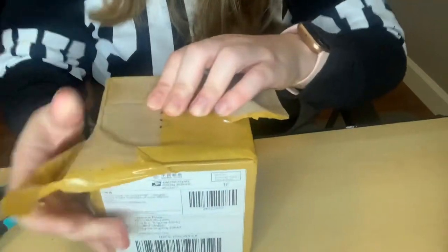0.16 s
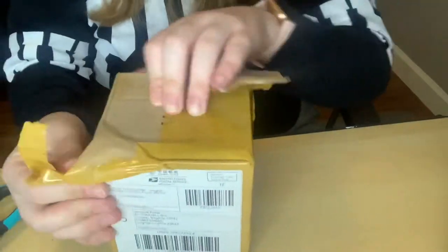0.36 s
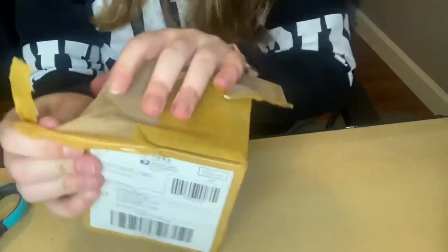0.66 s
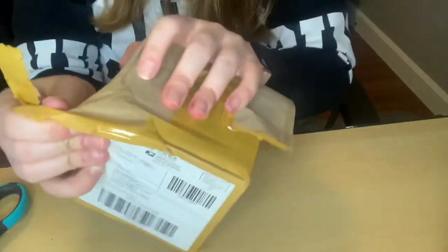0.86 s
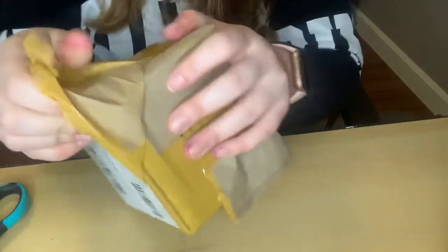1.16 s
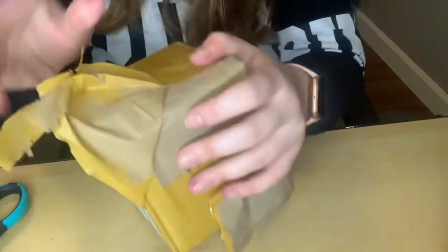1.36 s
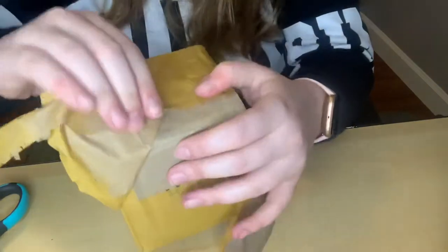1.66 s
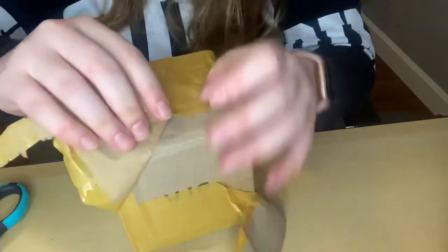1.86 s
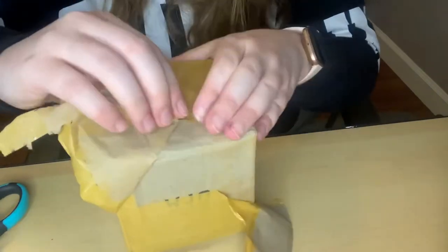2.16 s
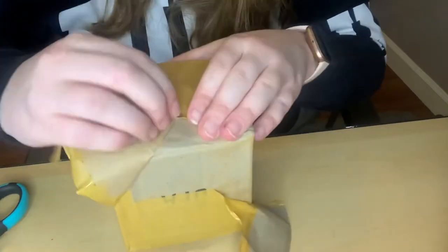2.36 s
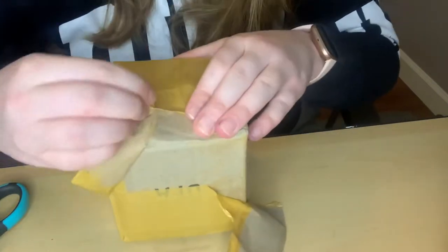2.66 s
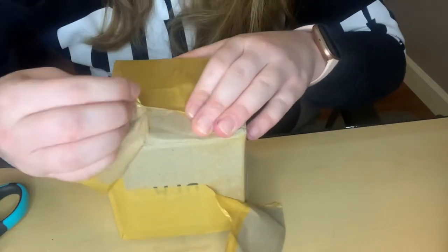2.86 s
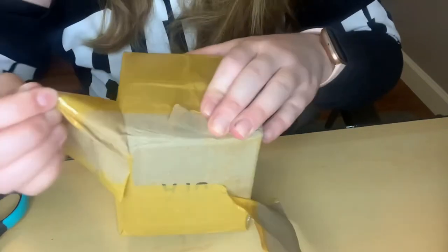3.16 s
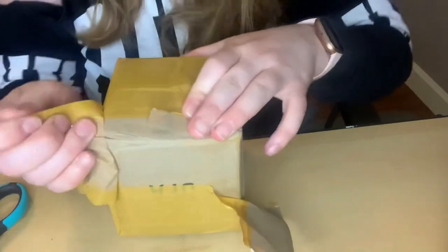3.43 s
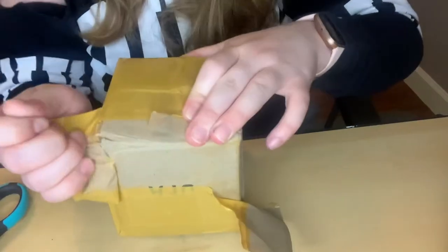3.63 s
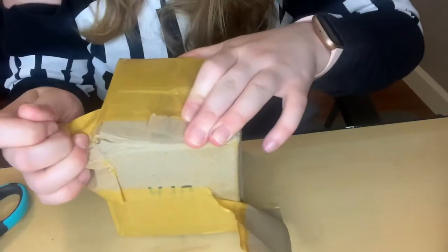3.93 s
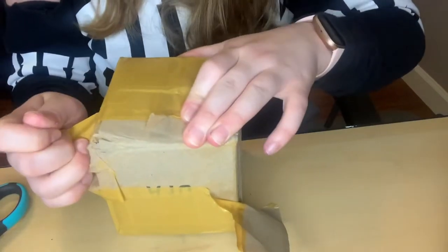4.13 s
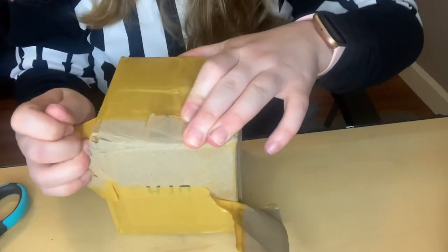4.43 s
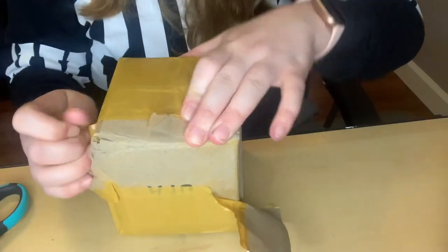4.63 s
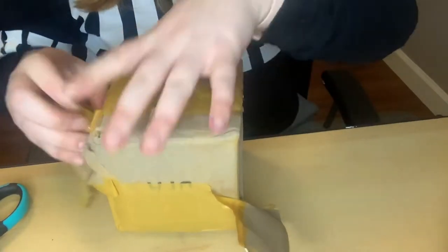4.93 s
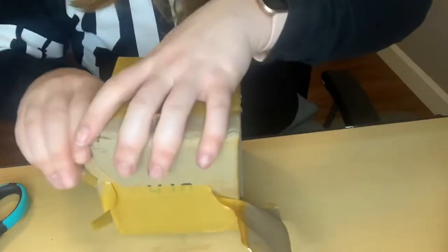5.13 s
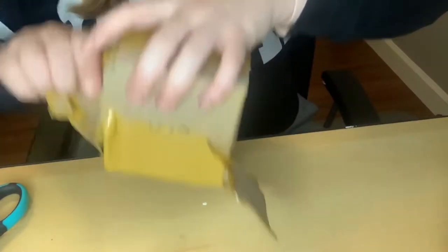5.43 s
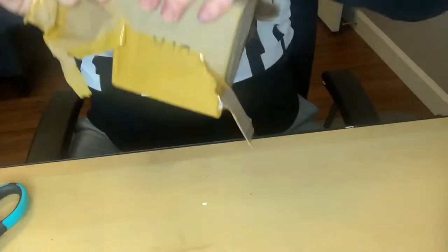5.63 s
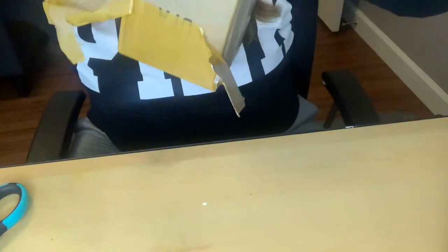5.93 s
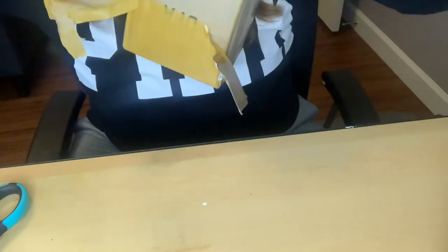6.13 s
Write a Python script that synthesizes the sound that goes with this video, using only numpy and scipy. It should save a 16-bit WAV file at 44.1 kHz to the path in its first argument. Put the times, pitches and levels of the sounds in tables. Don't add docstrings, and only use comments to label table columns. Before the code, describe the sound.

A close stereo microphone in a small, still room with faint hum. From 0 s, hands work glossy tape and paper on a cardboard box: fine bright crackle, crease snaps and low desk bumps, with quick bursts at 0.05, 0.2 and 0.3 s and soft hollow finger taps. A crisp pop at 1.0 s and crinkles to 1.25 s lead into a near lull until 1.5 s, then lighter crinkling and taps. From 2.2 to 2.8 s tape peels in glossy, thudding jerks. A hard rip with a box thump lands at 2.92 s. Smaller crackles follow, a dense cluster at 3.5-3.6 s, a sharp tear at 4.19 s, and busy snapping at 4.6-4.9 s. A thud at 5.07 s and peels at 5.3 s precede the lift at about 5.55 s. Snaps at 5.7 s, a violent tear at 5.95 s and the loudest rips around 6.2 s close it, with high rustling.

```python
import sys
import numpy as np
from scipy import signal
from scipy.fft import rfft, irfft, next_fast_len
from scipy.io import wavfile
from scipy.ndimage import uniform_filter1d

SR = 44100
rng = np.random.default_rng(int(sys.argv[2]) if len(sys.argv) > 2 else 0)


def how_loud(loudness_db):
    steps = np.asarray(loudness_db, float) / 20
    return 10 ** steps


def materialize(psi):
    bounded = np.clip(np.atleast_2d(psi).T, -1, 1)
    quanta = np.round(bounded * 32767).astype(np.int16)
    wavfile.write(sys.argv[1], SR, quanta)


N = 277389
SIZE = next_fast_len(N + SR)
HZ = np.fft.rfftfreq(SIZE, 1 / SR)
TIME = np.arange(N) / SR
SNAP_N = 2048

# frequency in Hz, level in dB.
AIR = [(30, 3), (100, -1.5), (400, -7.5), (1000, -34), (3000, -21), (8000, -44), (16000, -70)]
AIR_DB = -63
# time in seconds, fibre crackle in dB.
GRIP = [(0, -52), (.6, -51), (1.2, -55.5), (1.3, -79), (1.49, -86), (1.53, -74), (1.8, -58.5), (1.9, -62.5),
        (2.1, -63.5), (2.4, -52.5), (3.4, -58), (4.35, -53), (4.5, -61), (4.6, -48.5), (5.0, -59.5),
        (5.12, -65), (5.2, -58.5), (6.29, -50.5)]
GRIP_FILM_DB, GRIP_BOX_DB = -10, -6
# peak in seconds, fibre level in dB, film re fibre in dB, box re fibre in dB.
TUGS = [(.2, -62, 9, 7), (1.51, -80, 9, -15), (.3, -44.5, -20, -30), (.5, -52, -18, -8),
        (1.1, -46.5, -5, -33), (1.2, -47, -7, -6.5), (1.6, -44.5, -25, -1.5), (1.76, -58, -23, 9),
        (2.401, -44, 3, -30), (2.5, -59, 15, 7.5), (2.7, -50.5, -1, -21), (2.9, -50, -5, -28),
        (3.0, -40.5, -25, -6), (3.2, -46.5, -26, -3.5), (3.4, -50.5, -25, -21), (3.6, -39, -6, -11),
        (4.0, -50, 1, -5), (4.198, -39.5, -1.5, -11.5), (4.399, -49, -3, -4), (5.62, -69, -12, -5),
        (4.7, -37.5, -21, -11), (4.9, -43.5, -17, -5.5), (5.301, -37.5, -23, -25), (5.5, -52.5, 4, -15),
        (5.698, -36, -30, -33), (5.9, -61.5, 14, -22), (6.0, -37, -35, -30)]
TUG_SWELL_DB_PER_S, TUG_EASE_DB_PER_S = 203, 161
# start in seconds, length in seconds, then fibre, film and box levels in dB.
TEARS = [(0.027, 0.055, -36.5, -47, -48), (0.198, 0.065, -38.5, -40.5, -52),
         (1.242, 0.018, -35.5, -56, -46.5), (1.583, 0.045, -53, -70, -46.5), (1.955, 0.081, -60, -63, -49),
         (2.239, 0.0056, -30, -57, -34), (2.381, 0.017, -33, -32, -32), (2.432, 0.03, -40, -62, -36.5),
         (2.593, 0.0297, -28.5, -31, -34.5), (2.725, 0.069, -36.5, -40, -43.5),
         (2.924, 0.058, -25, -32, -32), (3.309, 0.027, -32.5, -70, -50), (3.549, 0.037, -37, -57, -48.5),
         (4.174, 0.016, -30, -51, -45), (4.652, 0.062, -39, -44.5, -69), (4.868, 0.06, -37.5, -44, -46.5),
         (5.255, 0.045, -41, -48, -44), (5.699, 0.025, -54, -29, -63), (5.937, 0.041, -27, -37.5, -63),
         (6.165, 0.057, -30, -40, -40.5)]
# frequency in Hz, width in Hz, level in dB.
SHEET_MODES = [(1560, 1030, 4), (1878, 126, 9), (3340, 1900, 8), (4000, 4800, 4.5), (6030, 2700, 8),
               (8360, 1200, 4)]
# frequency in Hz, width in Hz, level in dB.
BOX_MODES = [(455, 260, 5), (257, 99, -10), (520, 300, -7.5), (1130, 1290, 1)]
# frequency in Hz, width in Hz, level in dB.
DESK_MODES = [(137, 14, -2.5), (92, 60, -9), (55, 30, -12), (225, 110, -8)]
FILM_HZ, FILM_WIDTH_HZ = 12000, 8800

# start in seconds, peak in dB, sheet pitch in Hz.
PAPER = [(0.268, -17, 1250), (0.38, -25, 4450), (0.647, -31, 5600), (0.682, -27.5, 3950),
         (0.998, -12, 3330), (1.428, -37, 5800), (1.533, -31.5, 1250), (1.576, -25, 3600),
         (1.625, -33, 1700), (1.691, -30, 4300), (1.78, -28.5, 3400), (1.838, -17, 1790),
         (3.261, -38, 2950), (3.332, -20, 1920), (3.598, -8.5, 2800), (3.611, -20.5, 3300),
         (4.2062, -17, 1350), (4.565, -14.5, 2950), (4.852, -21, 3200), (4.874, -12.5, 2970),
         (5.163, -31, 3860), (5.415, -28, 3000), (5.655, -25, 3470), (5.69, -14, 4460)]
# start in seconds, peak in dB, sheet pitch in Hz.
COATED = [(0.421, -16, 4170), (0.46, -15.5, 2300), (0.722, -24.5, 5200), (0.73, -20.5, 2100),
          (0.802, -25, 1920), (0.846, -24.5, 1570), (0.955, -28.5, 2660), (1.105, -13.5, 3960),
          (1.566, -18, 3520), (2.014, -18, 3650), (2.23, -15, 3950), (2.609, -15, 1290), (2.923, -4, 3160),
          (3.208, -21.5, 2280), (3.315, -22, 930), (3.501, -31, 3010), (3.6635, -26, 3100),
          (3.679, -22, 3500), (4.015, -16, 4060), (4.05, -26.5, 3800), (4.42, -22.5, 3660),
          (4.694, -16.5, 4500), (4.701, -13.5, 3470), (4.713, -12, 7060), (5.179, -23, 4000),
          (5.191, -19, 3880), (5.4642, -19.5, 2800), (5.947, -3, 4180), (6.202, -7.5, 2860),
          (6.212, -0.5, 3880)]
# start in seconds, peak in dB, sheet pitch in Hz.
TAPED = [(0.037, -18.5, 2040), (0.244, -41, 1390), (0.311, -16.5, 4060), (0.564, -15.5, 4320),
         (0.926, -24.5, 4170), (1.248, -15.5, 2550), (1.657, -27, 1680), (1.801, -19.5, 3370),
         (1.87, -25.5, 5730), (2.734, -9, 1390), (2.77, -15.5, 3100), (2.787, -13, 7350),
         (3.107, -22, 1920), (3.146, -25.5, 1900), (3.194, -24, 1790), (3.477, -29, 3300),
         (3.52, -28, 4700), (3.534, -13, 3170), (3.567, -6, 2820), (3.5732, -12, 3100), (4.188, -4, 4250),
         (4.538, -20, 3300), (4.58, -16, 2880), (4.665, -22.5, 6500), (5.3185, -17, 5780),
         (5.344, -18.5, 4100), (5.426, -20, 2800), (5.684, -8, 4500)]
PAPER_FILM_DB, COATED_FILM_DB, TAPED_FILM_DB = -14, -4.5, 0.6
# start in seconds, peak in dB, sheet pitch in Hz, glossy tick re peak in dB.
PEELED = [(0.053, -20, 1010, 14), (0.521, -20, 6800, 2), (1.154, -33, 3400, 10), (1.263, -20, 3560, -5),
          (2.243, -17.5, 1490, 11), (2.362, -52.5, 3630, 35.5), (2.385, -16.5, 1360, 16),
          (2.443, -15, 1310, 15), (2.533, -35.5, 7020, 17), (2.553, -47.5, 7360, 31.5),
          (2.597, -18.5, 1260, 13), (2.794, -32.5, 3800, 19), (3.281, -22.5, 4000, 3),
          (3.447, -29.5, 5260, 6.5), (3.859, -31, 6100, 1), (4.078, -22.5, 4200, 9.5),
          (4.274, -23.5, 4900, 1.5), (4.317, -22.5, 4300, 11.5), (4.633, -36, 2560, 8),
          (4.645, -30.5, 3060, 9), (4.68, -20, 4700, 1), (4.722, -21.5, 4160, 1), (5.265, -17, 2030, 13.5),
          (5.289, -17, 1170, 8.5), (5.485, -18, 4500, 8), (5.521, -30, 2920, 15.5), (6.132, -28.5, 4360, 3),
          (6.158, -23, 6400, 14), (6.168, -14, 3470, 12)]
# start in seconds, peak in dB, sheet pitch in Hz, glossy
# tick re peak in dB.
MORE_CREASES = [(1.5265, -34.5, 3230, -14), (2.0047, -32, 3660, -26), (2.17, -38, 2560, -5),
                (2.918, -27, 3270, -24), (5.898, -31, 4770, -7), (5.944, -9.5, 6760, -19), (6.1868, -27, 4800, 17),
                (6.1948, -0.5, 3050, -20), (3.4021, -31.5, 1600, 0), (3.424, -33, 4800, -12),
                (3.772, -36.5, 1060, -1)]
# start in seconds, peak in dB, sheet pitch in Hz, glossy tick re peak in dB.
TICKS = [(.145, -46, 3260, -8), (.187, -46, 4140, -4), (0.2062, -24, 4450, -12), (.4783, -22.5, 1850, 0),
         (.5478, -41, 2450, -14), (.627, -44, 1140, -10), (.641, -35, 5650, -12), (0.96, -36, 2600, -8),
         (.981, -30, 1830, -13), (1.063, -36, 1840, -8), (1.0816, -34, 3690, -8), (1.1806, -33, 2100, -12),
         (1.236, -35.5, 960, -9), (1.97, -36, 1380, -8), (2.089, -36, 1860, -0.5), (2.914, -27, 3400, -16),
         (2.9255, -9.5, 1660, -10), (2.951, -17.5, 1020, -5), (2.976, -18, 3280, -18),
         (2.984, -14, 4200, -8), (3.156, -35, 1400, 5), (3.1764, -29, 3620, -12), (3.552, -27, 2450, 2),
         (3.558, -18, 3340, 2), (3.5778, -14, 1940, -8), (3.587, -32, 2800, -18), (3.607, -22, 2400, -15),
         (3.6581, -34, 3600, -10), (4.1914, -12.5, 1220, -12), (4.3728, -29, 4000, -11),
         (4.5236, -38, 3120, -20), (4.895, -24, 3210, -10), (5.149, -35, 1430, -23),
         (5.232, -32, 2500, -24), (5.323, -17, 4100, -7), (5.3485, -24, 2980, 0), (5.366, -28, 3300, -14),
         (5.594, -38, 3340, -8), (5.6366, -30, 3440, -13), (6.1737, -12, 3450, -2),
         (4.189, -14.5, 2400, -12), (4.1899, -6.5, 4270, -17), (4.312, -28, 3800, -4),
         (2.783, -20, 3270, -8), (2.836, -33, 3800, -8), (3.53, -33, 2500, -8)]
ECHO_THUD_DB = -25
# start in seconds, thud in dB.
JOLTS = [(0.0555, -26.5), (0.0753, -28.5), (0.22, -25.5), (.268, -37), (.363, -33.5), (0.4596, -30.5),
         (0.8453, -33), (1.5337, -33), (1.5679, -30.5), (2.014, -33.5), (2.2422, -27.5), (2.3851, -22),
         (2.4428, -23), (2.5978, -22.5), (2.7348, -23.5), (2.916, -43), (2.924, -13), (3.3312, -30.5),
         (3.534, -30.5), (4.1903, -17), (1.504, -36.5), (5.0669, -18), (5.2659, -20), (5.2905, -23.5),
         (5.6839, -14.5), (5.948, -5), (6.17, -21.5), (6.1949, -13.5), (6.2142, -7)]
LIFT_S = 5.55

# start in seconds, peak in dB.
DRAGS = [(0.044, -35), (0.217, -42), (0.329, -56), (0.419, -45), (0.498, -45), (1.236, -37.5), (1.581, -38),
         (1.659, -53), (1.965, -47), (2.241, -42), (2.397, -61), (2.599, -62), (2.74, -39.5), (2.929, -29),
         (3.196, -43.5), (3.333, -34), (3.553, -48), (3.68, -46), (3.769, -49), (3.1, -48), (1.506, -45),
         (4.184, -28.5), (4.299, -67), (4.698, -41.5), (4.937, -37.5), (5.063, -43), (5.268, -39)]
# start in seconds, peak in dB, wall pitch in Hz.
TAPS = [(0.187, -39, 404), (0.407, -35.5, 214), (0.487, -29.5, 781), (0.564, -32, 410), (0.626, -40, 377),
        (0.8, -37, 635), (0.868, -37, 310), (0.996, -35.5, 520), (1.112, -46, 350), (1.18, -43, 447),
        (1.229, -43, 188), (1.598, -34, 433), (1.835, -37, 352), (1.958, -38, 302), (2.094, -36.5, 510),
        (2.341, -48, 484), (2.946, -25, 150), (2.962, -21, 533), (3.144, -40.5, 276), (3.199, -35.5, 417),
        (3.333, -32, 194), (3.564, -28.5, 517), (3.886, -53, 651), (3.971, -43, 417), (4.014, -39, 433),
        (4.191, -24, 233), (4.654, -37, 410), (4.683, -36, 410), (4.712, -39, 546), (4.896, -36, 390),
        (5.423, -48, 409), (5.485, -40, 430), (5.521, -37.5, 385), (5.565, -40, 415), (5.653, -43, 439),
        (5.835, -50, 301), (5.896, -45, 385)]
TAP_CYCLES, TAP_DB = 1.36, -4.5
# peak in seconds, half length in seconds, level in dB, pitch in Hz.
RUSTLES = [
    (4.24, 0.044, -51, 1400),
    (6.3, 0.062, -50.5, 1010),
    (4.44, 0.018, -52, 1050),
    (5.62, 0.033, -52, 1460),
    (6.0, 0.075, -42, 4600),
    (5.1, .04, -51, 660),
    (6.235, 0.049, -37, 4400),
    (3.59, 0.036, -44, 2300),
    (2.27, 0.036, -43.5, 4600),
    (2.96, 0.035, -36.5, 1550),
]

# frequency in Hz, level in dB.
ROOM_COLOUR = [(60, 7.5), (200, 0), (700, -3.5), (2000, -1.5), (5000, -4.5), (9000, -2), (14000, -8.5),
               (17000, -25)]
ROOM_T60_S, ROOM_DB = 0.29, -8
# frequency in Hz, phase in radians.
PORT_PHASE = [(300, .21), (4500, .12), (6500, 1.42), (8600, 3.2), (10700, 4.3), (12700, 5.9), (13800, 6.28),
              (16000, 7.3)]
# frequency in Hz, share from 0 to 1.
PORT_UNLIKE = [(40, .4), (130, .3), (1200, .38), (3000, .53), (6500, .4), (9000, .12), (11500, .35),
               (14000, .1)]


def on_hz(table):
    hz, value = np.transpose(table)
    return np.interp(np.log(HZ + 1), np.log(hz), value)


def unit(x):
    return x / np.sqrt(np.mean(x ** 2))


def top(x):
    return x / np.max(np.abs(x))


def ring(x, hz, width_hz):
    return signal.lfilter(*signal.iirpeak(hz, hz / width_hz, fs=SR), x)


def ring_twice(x, hz, width_hz):
    return ring(ring(x, hz, width_hz), hz, width_hz)


def body(x, modes):
    return sum((-1) ** k * how_loud(db) * ring(x, hz, width) for k, (hz, width, db) in enumerate(modes))


def glossy(x):
    return ring_twice(x, FILM_HZ, FILM_WIDTH_HZ)


def grains(per_s, spread_db, hiss):
    release = rng.random(N) < per_s / SR
    strength = how_loud(spread_db * np.minimum(rng.exponential(size=N), 4))
    sign = np.sign(rng.standard_normal(N))
    return unit(release * sign * strength + hiss * rng.standard_normal(N))


def air():
    noise = rfft(rng.standard_normal((2, N)), SIZE)
    return how_loud(AIR_DB) * unit(irfft(noise * how_loud(on_hz(AIR)), SIZE)[:, :N])


def effort():
    grip = np.interp(TIME, *np.transpose(GRIP))
    power = how_loud(grip + np.array([[0], [GRIP_FILM_DB], [GRIP_BOX_DB]])) ** 2
    for s, db, film_db, box_db in TUGS:
        shape = db - np.maximum(TUG_SWELL_DB_PER_S * (s - TIME), TUG_EASE_DB_PER_S * (TIME - s))
        power = power + how_loud(2 * shape) * how_loud(np.array([[0], [film_db], [box_db]])) ** 2
    for start, length, *db in TEARS:
        rise = np.clip((TIME - start) / 0.0071, 0, 1)
        fall = np.exp(-np.maximum(TIME - start - length, 0) / 0.0033)
        power = power + how_loud(np.array(db))[:, None] ** 2 * rise * fall
    catch = unit(uniform_filter1d(rng.standard_normal(N), size=300))
    return np.sqrt(power) * how_loud(2.1 * catch)


def patchy():
    smooth = uniform_filter1d(rng.standard_normal(N), size=1500)
    return unit(uniform_filter1d(smooth, size=1500))


def crackle():
    fibre, film, box = effort()
    shared = grains(per_s=500, spread_db=3.4, hiss=0.08)
    sheet = np.zeros(N)
    for hz, width, db in SHEET_MODES:
        own = grains(per_s=350, spread_db=4.2, hiss=0.18)
        sheet += how_loud(db + 4.5 * patchy()) * ring(shared + own, hz, width)
    gloss = glossy(shared + 10 * rng.standard_normal(N))
    hollow = body(grains(per_s=290, spread_db=6, hiss=0.57), BOX_MODES)
    return fibre * unit(sheet) + film * unit(gloss) + box * unit(hollow)


def snaps():
    out, push = np.zeros(N + SNAP_N), np.zeros(N + SNAP_N)
    t = np.arange(SNAP_N) / SR
    kinds = (PAPER, PAPER_FILM_DB), (COATED, COATED_FILM_DB), (TAPED, TAPED_FILM_DB)
    creases = [(*row, film_db) for table, film_db in kinds for row in table]
    creases += [*PEELED, *MORE_CREASES, *TICKS]
    late = np.maximum(t - 0.002, 0)
    thud = top(body(late * np.exp(-late / 0.00041), BOX_MODES))
    for s, db, hz, film_db in creases:
        buckle, tick = rng.standard_normal((2, SNAP_N))
        span = 0.00039 * how_loud(0.33 * (db + 23))
        burst = buckle * (t / span * np.exp(-t / span) + 0.15 * np.exp(-t / 0.0037))
        own_pitch = top(ring_twice(burst, hz, 0.4 * hz))
        sheet = top(own_pitch + 0.55 * top(body(burst, SHEET_MODES)))
        flick = t / 0.00076 * np.exp(-t / 0.000177) + 0.089 * np.exp(-t / 0.00266)
        film = top(glossy(tick * flick))
        i = int(s * SR)
        out[i:i + SNAP_N] += how_loud(db - 2) * (sheet + how_loud(film_db) * film)
        push[i:i + SNAP_N] += how_loud(db + ECHO_THUD_DB) * thud
    for s, db in JOLTS:
        i = int(s * SR)
        push[i:i + SNAP_N] += how_loud(db) * thud
    push = push[:N]
    through_desk = body(push * (TIME < LIFT_S), DESK_MODES)
    return out[:N] + how_loud(-3.5) * push + how_loud(13.5) * through_desk


def desk():
    since = np.maximum(TIME - np.array(DRAGS)[:, :1], 0)
    weight = how_loud(np.array(DRAGS)[:, 1:])
    bump = np.sum(weight * since / 0.0026 * np.exp(-since / 0.0096), axis=0)
    drag = np.sum(weight * (since > 0) * np.exp(-since / 0.027), axis=0) + how_loud(-86)
    rough = drag * grains(per_s=100, spread_db=5, hiss=0.38)
    return body(how_loud(23) * rough + how_loud(10.5) * bump, DESK_MODES)


def taps():
    out, t = np.zeros(N + SNAP_N), np.arange(SNAP_N) / SR
    for s, db, hz in TAPS:
        age = t * hz / TAP_CYCLES
        swell = np.e * 2 * age * np.exp(-2 * age)
        i = int(s * SR)
        out[i:i + SNAP_N] += how_loud(db + TAP_DB) * swell * np.sin(2 * np.pi * hz * t)
    return out[:N]


def rustle():
    fine = grains(per_s=1300, spread_db=3.5, hiss=0.32)
    out = np.zeros(N)
    for s, half, db, hz in RUSTLES:
        swell = np.exp(-((TIME - s) / half) ** 2)
        out += how_loud(db) * swell * unit(ring_twice(fine, hz, 0.5 * hz))
    return out


def room(x):
    t = np.arange(SR // 2) / SR
    onset = np.clip((t - 0.002) / 0.00024, 0, 1)
    tail = rng.standard_normal((2, len(t))) * how_loud(-60 * t / ROOM_T60_S) * onset
    tail = tail / np.sqrt(np.sum(tail ** 2, axis=1, keepdims=True))
    answer = rfft(x, SIZE) * rfft(tail, SIZE) * how_loud(on_hz(ROOM_COLOUR))
    return how_loud(ROOM_DB) * irfft(answer, SIZE)[:, :N]


def detour(x):
    t = np.arange(256) / SR
    paths = rng.standard_normal((3, 256)) * np.exp(-t / 0.0017)
    highpass = signal.butter(2, 350, "high", fs=SR, output="sos")
    paths = signal.sosfilt(highpass, paths)
    sway_hz = np.array([[0.9], [1.3], [1.7]])
    sway = np.cos(2 * np.pi * (sway_hz * TIME + rng.random((3, 1))))
    scattered = sum(w * signal.fftconvolve(x, p / np.linalg.norm(p))[:N] for w, p in zip(sway, paths))
    return 0.87 * scattered + ring(x, 170, 410)


def ports(shared, other):
    unlike, side = np.clip(on_hz(PORT_UNLIKE), 0, 0.95), np.array([[1], [-1]])
    turn = np.exp(0.5j * side * on_hz(PORT_PHASE))
    alike = np.sqrt(1 - unlike ** 2) * rfft(shared, SIZE)
    return irfft(turn * (alike + side * unlike * rfft(other, SIZE)), SIZE)[:, :N]


def scene():
    near = crackle() + snaps() + desk() + taps() + rustle()
    far = room(near) + air()
    return ports(near + far[0], detour(near) + far[1])


def joint(x, margin_db, jump_db, from_hz, top_hz):
    hz, _, pair = signal.stft(np.array([x[0] + x[1], x[0] - x[1]]) / 2, SR, nperseg=1536)
    bands = uniform_filter1d(np.abs(pair) ** 2, size=24, axis=1)
    power = uniform_filter1d(np.sum(x ** 2, axis=0), size=128)
    at = np.arange(pair.shape[2])[:, None] * 768 + np.arange(384, 1152)
    frames = np.pad(power, (768, 2304))[at]
    calm = frames.max(axis=1) < how_loud(2 * jump_db) * frames.mean(axis=1)
    ruled = (bands < how_loud(-2 * margin_db) * bands[::-1]) & (hz > from_hz)[:, None]
    weak = ruled | (hz > top_hz)[:, None]
    mid, side = signal.istft(pair * ~(weak & calm), SR, nperseg=1536)[1][:, :N]
    return np.array([mid + side, mid - side])


def low_pass(x):
    return signal.sosfilt(signal.butter(12, 16980, fs=SR, output="sos"), x)


def record(dry):
    band = signal.sosfilt(signal.butter(2, 45, "high", fs=SR, output="sos"), dry)
    soft = 0.95 * np.tanh(band / 0.95)
    lowpass = signal.ellip(8, 0.2, 60, 16750, fs=SR, output="sos")
    soft = signal.sosfiltfilt(lowpass, soft)
    mix = joint(soft, margin_db=4, jump_db=6, from_hz=7100, top_hz=15900)
    return low_pass(mix)


dry = scene()
out = record(dry)
materialize(out)
```